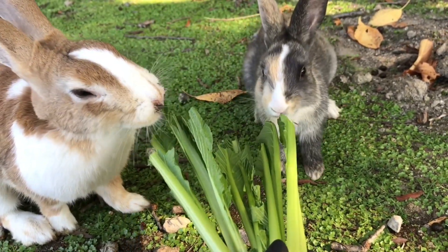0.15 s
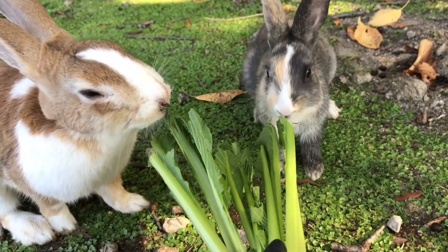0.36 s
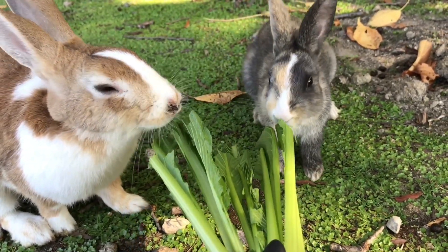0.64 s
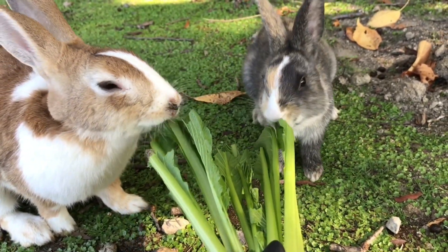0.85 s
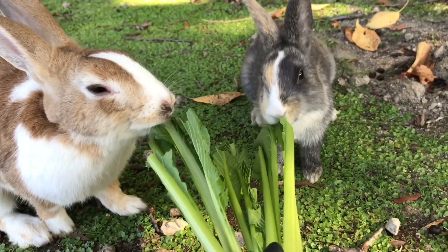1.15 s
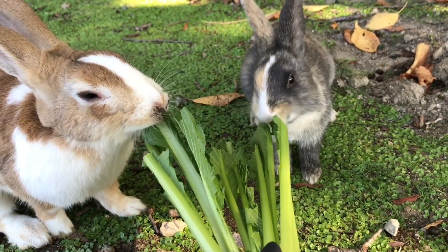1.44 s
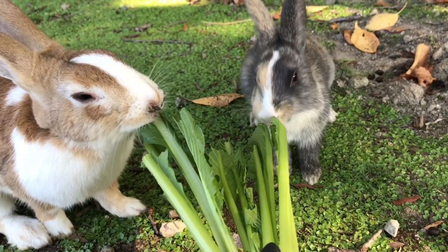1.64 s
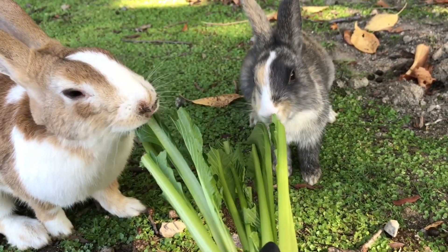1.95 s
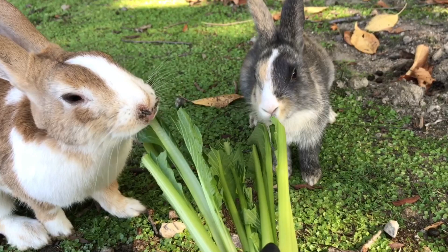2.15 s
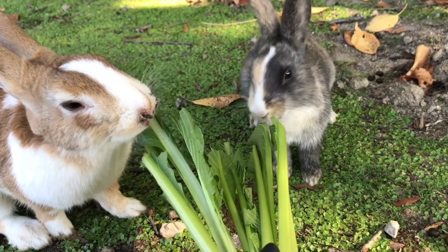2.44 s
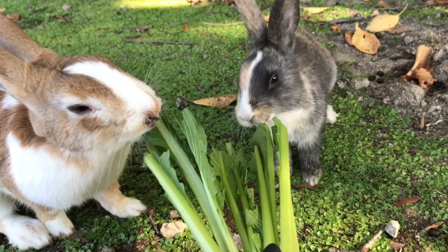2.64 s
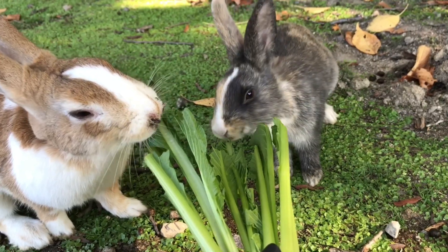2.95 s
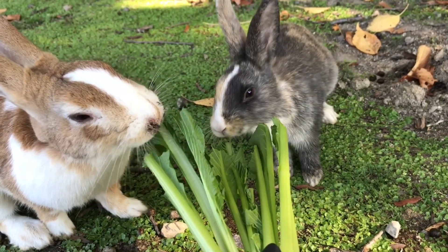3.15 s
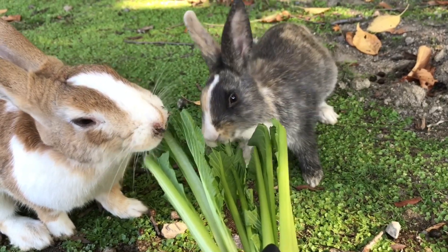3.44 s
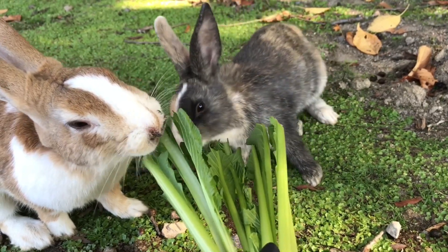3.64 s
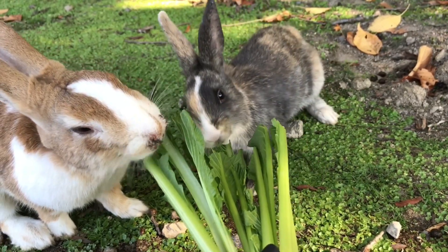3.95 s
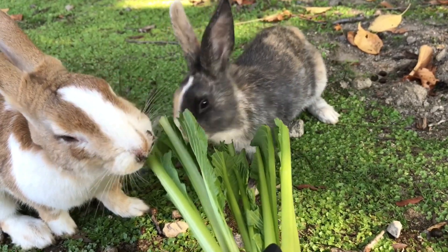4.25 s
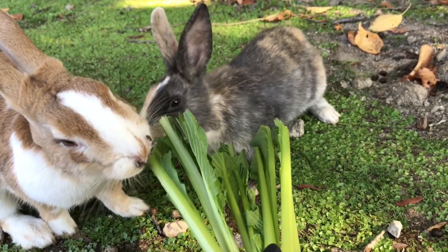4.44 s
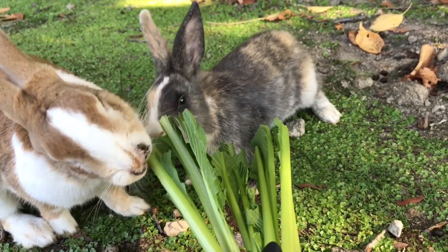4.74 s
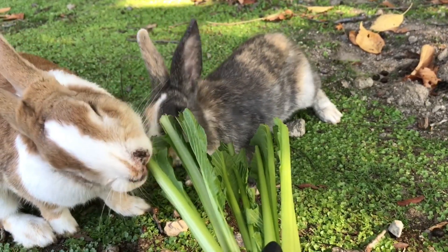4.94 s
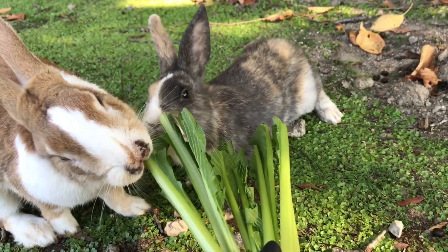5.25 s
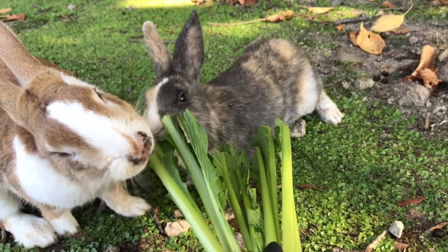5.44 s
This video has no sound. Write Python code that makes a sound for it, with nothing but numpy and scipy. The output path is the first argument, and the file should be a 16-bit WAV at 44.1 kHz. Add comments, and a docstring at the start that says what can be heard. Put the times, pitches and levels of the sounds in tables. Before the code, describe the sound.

Two rabbits bite and chew crisp leaf stalks close up on a lawn, crackling over low rumble, with a faint bird trill and cricket chirps.

```python
"""On a lawn, close to a small microphone, two rabbits bite and chew crisp leaf stalks for 5.6 s.
First bites crackle over low rumble, hiss and a sinking hum; snaps are loudest from 1.1 to 1.6 s.
Far off a bird trills once at 1.6 s, and from 2 s a cricket chirps; chewing thins near 2.5 s and
4.5 s, then crackles again from 5 s. Snaps and grinding are filtered noise bursts, rumble and hiss
shaped noise, the hum a swaying tone, and the far calls sine notes with garden echoes."""
import sys
import numpy as np
from scipy import signal
from scipy.io import wavfile
from scipy.ndimage import uniform_filter1d

SR = 44100
rng = np.random.default_rng(int(sys.argv[2]) if len(sys.argv) > 2 else 0)


def to_wav(sig):
    """Store sig (one row per channel, or 1-D mono) as 16-bit WAV at the path in sys.argv[1].

    Samples outside -1..1 are clipped; the rate is SR.
    """
    pcm = np.clip(np.atleast_2d(sig), -1, 1) * 32767
    pcm = np.round(pcm).astype(np.int16)
    wavfile.write(sys.argv[1], SR, pcm.T)  # frames by channels


N = 246519  # samples, about 5.6 s


def gain_of(db):
    """Decibels to gain."""
    return 10 ** (np.asarray(db) / 20)


def evened(x):
    """Scales to rms 1."""
    return x / np.sqrt(np.mean(x ** 2) + 1e-20)


def read(points, hz):
    """Reads a spectrum on a log-frequency axis."""
    f, value = np.transpose(points)
    return np.interp(np.log(hz + 1), np.log(f + 1), value)


def add(mix, s, sound):
    """Mixes a sound in at second s."""
    part = mix[round(s * SR):][:len(sound)]
    part += sound[:len(part)]


def bump(hz, centre_hz, width_hz):
    """A broad resonance of height 1."""
    return np.exp(-.5 * ((hz - centre_hz) / width_hz) ** 2)


def coloured(x, gain_db):
    """Filters the last axis causally: the phase follows from the log gain (minimum phase)."""
    log_gain = np.log(gain_of(np.maximum(gain_db, -100)))
    circle = np.concatenate([log_gain, log_gain[..., -2:0:-1]], -1)
    spectrum = np.exp(np.conj(signal.hilbert(circle)))
    taps = np.fft.ifft(spectrum).real[..., :256]
    return signal.oaconvolve(x, taps, axes=-1)[..., :x.shape[-1]]


# Clearest single fibres breaking, close to the microphone:
# (time [s], leaf peak [dB], jaw thud relative to leaf [dB], leaf ring [Hz], jaw ring [Hz])
CLEAR_SNAPS = [(.087, -55, 16, 3880, 1280), (.4167, -43, -18, 5940, 1360), (.4206, -27.5, -33, 9900, 820),
               (.81, -28.5, -12.5, 4500, 1230), (.8967, -22, -33, 7900, 1010),
               (.9037, -27, -33, 8650, 1250), (.919, -45, -9, 6030, 1490), (.931, -37, -19, 4110, 1570),
               (.9371, -29.5, -16, 4410, 1420), (.9824, -21.5, -18, 7500, 1440),
               (1.1023, -10, -43, 9200, 1610), (1.108, -27, -24, 8420, 1460),
               (1.1112, -20, -17, 8050, 2350), (1.1271, -25.5, -11, 7710, 1490),
               (1.156, -25, -5, 4630, 1310), (1.1622, -22.5, -7.5, 7140, 1330),
               (1.1751, -31, -13, 7450, 2150), (1.2059, -34, -12, 7360, 2650),
               (1.266, -30, -26, 4670, 1160), (1.2822, -21.5, -28, 10900, 820),
               (1.2872, -18.5, -11, 4500, 1330), (1.2955, -18.5, -16, 4400, 1020),
               (1.3584, -23, -20, 8340, 1030), (1.4213, -17, -24, 5830, 2300),
               (1.4243, -9, -16, 9600, 2380), (1.4274, -28, -5, 8630, 1490), (1.4459, -22, -29, 8460, 2990),
               (1.4497, -18, -20, 7280, 1610), (1.4551, -28, -12, 8810, 1480),
               (1.4576, -27, -8, 9990, 1660), (1.4859, -27, -16, 8310, 1490),
               (1.4889, -25, -13, 6660, 1420), (1.5179, -19, -14, 8940, 1620),
               (1.5292, -32, -28, 6220, 2630), (1.5343, -23, -14, 10200, 1120),
               (1.5393, -8, -15, 6060, 1780), (1.5428, -7, -15, 5100, 2350), (1.5608, -15, -24, 9050, 2020),
               (1.5648, -19.5, -25, 4840, 1020), (1.574, -28, -24, 9650, 2990),
               (1.7099, -27, -16, 10100, 1460), (1.7509, -21.5, -17, 9000, 1770),
               (1.7659, -22, -17, 4530, 1760), (1.7751, -23.5, -9, 6400, 2340),
               (1.8042, -27.5, -9, 4460, 2290), (1.9521, -29.5, -18, 4400, 1940),
               (1.9752, -19.5, -10.5, 9050, 2330), (2.0187, -29, -20, 9780, 1340),
               (2.0304, -30.5, -17, 4700, 2070), (2.121, -32, -10, 5600, 2170),
               (2.1337, -19.5, -13.5, 5070, 2210), (2.1712, -29, -25, 5400, 2000),
               (2.1917, -14.5, -14.5, 5670, 2000), (2.201, -29.5, -8, 5320, 2070),
               (2.3206, -17.5, -24, 8000, 2370), (2.3257, -12, -20.5, 6460, 2250),
               (2.3862, -19.5, -9.5, 6400, 1640), (2.7206, -42.5, -3, 4180, 1250),
               (2.9191, -26, -12.5, 5170, 2370), (2.9295, -31, -12, 6850, 2260),
               (2.9696, -30.5, -1, 4400, 2100), (2.9725, -25, -11.5, 4300, 2320),
               (2.9941, -33, -22, 9710, 900), (3.2039, -25.5, -7, 4600, 2230),
               (3.2067, -20.5, -9, 9400, 2250), (3.2353, -18.5, -15.5, 5540, 2310),
               (3.2577, -46, 9, 8810, 1120), (3.2665, -39.5, 3, 9970, 1100),
               (3.3467, -33.5, -10, 4440, 1240), (3.4305, -25, -29, 7900, 1010),
               (3.4353, -20, -28, 4220, 1290), (3.4467, -24, -15, 4570, 1290),
               (3.4683, -22.5, -12.5, 5640, 2300), (3.4736, -25, -12, 9400, 2300),
               (3.5689, -40, -9, 9000, 1100), (3.6174, -32, -23, 6310, 1270),
               (3.6546, -25.5, -28, 9000, 1360), (3.6844, -30, -24, 4720, 1400),
               (3.7003, -14, -12, 5340, 2200), (3.8891, -28, -31, 4400, 1380),
               (3.926, -42, 2.5, 4220, 2280), (4.0291, -18.5, -21, 10600, 2300),
               (4.0343, -17.5, -16.5, 4900, 2270), (4.0413, -20.5, -12, 3800, 2420),
               (4.0938, -18, -18.5, 6600, 2540), (4.1578, -25.5, -13.5, 3980, 2520),
               (4.9946, -22.5, -17, 4200, 2970), (5.1754, -20.5, -12.5, 9500, 2750),
               (5.1897, -24, -18, 10800, 2410), (5.2027, -22, -9.5, 3900, 2710),
               (5.2135, -28, -13, 8910, 1450), (5.2371, -22.5, -25, 9100, 2540),
               (5.2594, -26.5, -22, 9500, 2330), (5.4104, -33.5, -27, 10300, 860),
               (5.434, -38.5, -6, 10340, 1230), (5.4992, -36.5, -1, 5990, 1360),
               (5.508, -30, -17, 4370, 2250)]
# Colour of the breaking leaf, in snaps and grinding: (frequency [Hz], relative level [dB])
LEAF_COLOUR = [(2000, -31), (3400, -13), (3800, -0.5), (5000, 0), (6000, 2), (7500, -0.5), (9600, 3),
               (12000, -0.5), (22000, -25)]
# Colour of the jaw's knock: (frequency [Hz], relative level [dB])
JAW_COLOUR = [(300, -39), (700, -4), (1400, -0.5), (2300, 1), (2900, -3), (3500, -12.5), (6000, -41)]
SNAP_DECAY_MS, SNAP_TAIL_MS, SNAP_TAIL_DB = .22, 1.6, -15  # typical decay; faint after-crackle
BRIGHT_SCATTER_DB = 2.0  # each break is brighter or duller by chance
TILT_HZ = 7200  # parts dull from bright crackle


def snaps():
    """Each break is a very short burst of noise with a faint after-crackle, heard through leaf and jaw."""
    t_ms, hz = np.arange(400) * 1000 / SR, np.fft.rfftfreq(1024, 1 / SR)
    columns = np.vstack([CLEAR_SNAPS, lesser_snaps()]).T
    s, peak_db, jaw_db, leaf_hz, jaw_hz = columns[:, :, None]
    draws = rng.standard_normal((len(s), 402))
    decay_ms = SNAP_DECAY_MS * np.exp(.3 * draws[:, :1])
    bright_db = BRIGHT_SCATTER_DB * draws[:, 1:2]
    noise_burst = draws[:, 2:]

    after_crackle = gain_of(SNAP_TAIL_DB) * np.exp(-t_ms / SNAP_TAIL_MS)
    onset = np.minimum(t_ms / .12, 1)
    burst = noise_burst * (np.exp(-t_ms / decay_ms) + after_crackle) * onset

    # tips the balance of bright and dull crackle at random for each break
    tilt = .5 * np.tanh((hz - TILT_HZ) / 1200)
    leaf_db = read(LEAF_COLOUR, hz) + bright_db * tilt + 9 * bump(hz, leaf_hz, 790)
    knock_db = read(JAW_COLOUR, hz) + 8 * bump(hz, jaw_hz, 224)
    leaf = unit_peak(coloured(burst, leaf_db))
    jaw = unit_peak(coloured(burst, knock_db))
    sounds = gain_of(peak_db) * (leaf + gain_of(jaw_db) * jaw)
    out = np.zeros(N)
    for start, sound in zip(s[:, 0], sounds):
        add(out, start, sound)
    return out


def unit_peak(x):
    """Scales each row to an envelope peak of 1."""
    return x / abs(signal.hilbert(x)).max(1, keepdims=True)


LESSER_PER_CHEW = 3
LESSER_DB, LESSER_SCATTER_DB = 10, 7.5  # typical peak over the stroke's level, and its scatter
LESSER_JAW_DB, LESSER_JAW_SCATTER_DB = -11, 5.8  # jaw thud over the stroke's cheek share
LEAF_RING_HZ, JAW_RING_HZ = (4000, 10000), (850, 2500)  # ranges of their rings
HARD_STROKE_DB = -45  # strokes softer than this mash the leaf and break fibres less cleanly
MASH_LOSS = 0.71  # dB lost by lesser breaks per dB of softness


def lesser_snaps():
    """Rows like CLEAR_SNAPS for small breaks scattered through every stroke, weaker towards its ends."""
    s, db, rise_ms, fall_ms, cheek_db = np.repeat(CHEW_STROKES, LESSER_PER_CHEW, axis=0).T
    size, jaw = rng.standard_normal((len(s), 2)).T
    place, leaf_pick, jaw_pick = rng.random((len(s), 3)).T
    lag = 2 * place - 1  # -1 at the start of the stroke, 0 at its peak, 1 at its end
    when = s + lag * np.where(lag < 0, rise_ms, fall_ms) / 1000
    mash_db = MASH_LOSS * np.maximum(HARD_STROKE_DB - db, 0)
    peak_db = db + LESSER_DB + LESSER_SCATTER_DB * size - 5.0 * lag ** 2 - mash_db
    jaw_db = cheek_db + LESSER_JAW_DB + LESSER_JAW_SCATTER_DB * jaw
    leaf_hz = np.interp(leaf_pick, [0, 1], LEAF_RING_HZ)
    jaw_hz = np.interp(jaw_pick, [0, 1], JAW_RING_HZ)
    return np.transpose([when, peak_db, jaw_db, leaf_hz, jaw_hz])


# Grinding strokes of the teeth, close by; rise and fall are the times to 9.5 dB below the peak:
# (time of peak [s], level [dB], rise [ms], fall [ms], cheek thud relative to the stroke [dB])
CHEW_STROKES = [(.09, -83, 4.4, 6, 0), (0.229, -56, 68, 12, 0.5), (0.42, -55.5, 3.9, 41, 1),
                (.471, -49.5, 25, 11, 0), (0.681, -51, 41, 6.5, -4), (.81, -58.5, 34, 160, -4),
                (.903, -41.5, 8.1, 23, -11.5), (.988, -48.5, 19, 12, -12), (1.018, -48.5, 11, 33, -15),
                (1.106, -41, 14.3, 50, -11.5), (1.157, -45, 7.3, 16, -17), (1.206, -56.5, 21, 20, -10),
                (1.293, -49.5, 40, 7.7, -30), (1.425, -40, 6.1, 11.4, -16), (1.453, -36, 10, 10.7, -19),
                (1.489, -38, 7, 7.1, -10), (1.513, -42, 10, 10.2, -11), (1.542, -41, 4, 11, -19),
                (1.568, -49.5, 8.5, 16, -8), (1.73, -50, 10, 23, -3), (1.771, -49, 58, 32, -9),
                (1.805, -52, 15, 10, -12), (1.835, -56, 12, 20, -4), (1.979, -47, 24, 30, -13),
                (2.196, -52, 37, 4, -8), (2.325, -43, 6.9, 22.5, -22), (2.39, -50.5, 4.4, 30, -2.5),
                (2.538, -52, 26, 19, -9), (2.924, -51, 11, 23, -15), (2.968, -46, 5.8, 8.6, -4),
                (2.999, -54, 15, 13, -5), (3.204, -45.5, 20, 9, -10), (3.23, -54.5, 21, 18, -1),
                (3.352, -58, 17, 16, 0), (3.443, -41, 29, 11, -17), (3.47, -48, 17, 17, -14),
                (3.622, -47, 8, 24, -11), (3.659, -46, 18, 45, -10.5), (3.889, -44, 18, 8.3, -13),
                (3.925, -54, 63, 30, -5.5), (4.039, -50.5, 11, 10, -3), (4.094, -51, 13, 9, -5),
                (4.284, -56.5, 54, 36, -1), (4.5, -59, 12, 31, 1), (4.758, -56, 32, 13, -4.5),
                (4.997, -47, 5.5, 7.4, -13), (5.173, -45, 8, 12, -7.5), (5.2, -41, 16, 14, -11),
                (5.232, -46, 19, 7.9, -9), (5.265, -47, 5.5, 15, -4), (5.416, -52.5, 6.9, 19, -15),
                (5.505, -64.5, 17, 24, 6.5), (5.557, -50.5, 9.9, 15, -8)]
# Colour of the muffled cheek: (frequency [Hz], relative level [dB])
CHEEK_COLOUR = [(300, -20), (700, -16), (1100, 0.5), (1500, 3.5), (2300, -8), (3200, -10.5), (6000, -42)]
CRACKLE_PER_S = 1600  # average number of cell bursts per second
CHEW_BRIGHT_DB = -2.5  # bright against dull part: grinding is a little dull


def grinding():
    """Dense tiny cell bursts of uneven size and colour, swelling with each stroke of the teeth."""
    t_ms, hz = np.arange(N) * 1000 / SR, np.fft.rfftfreq(1024, 1 / SR)
    power = np.zeros((3, N))  # dull leaf, bright leaf, cheek
    for s, db, rise_ms, fall_ms, cheek_db in CHEW_STROKES:
        lag = t_ms - 1000 * s
        steps = (lag / np.where(lag < 0, rise_ms, fall_ms)) ** 2
        stroke = gain_of(db - 9.5 * np.minimum(steps, 20))
        shares = gain_of([[-CHEW_BRIGHT_DB / 2], [CHEW_BRIGHT_DB / 2], [cheek_db]])
        power += (stroke * shares) ** 2

    size = gain_of(4.5 * np.minimum(rng.exponential(1, N), 3.5))
    size = size * (rng.random(N) < CRACKLE_PER_S / SR)
    cells = size * rng.choice([-1., 1.], N) + .2 * rng.standard_normal(N)
    rings_hz = np.linspace(4000, 10500, 6)[:, None]  # six kinds of cell, each with its own ring
    kinds = cells * (rng.integers(0, 6, N) == np.arange(6)[:, None])
    ringing = coloured(kinds, read(LEAF_COLOUR, hz) + 12 * bump(hz, rings_hz, 700))
    leaf = evened(ringing.sum(0))
    dull = signal.oaconvolve(leaf, signal.firwin(31, TILT_HZ, fs=SR), "same")
    pulp = cells + 0.74 * rng.standard_normal(N)  # wet pulp smooths the thud
    cheek = evened(coloured(pulp, read(CHEEK_COLOUR, hz)))
    return (np.sqrt(power) * [dull, leaf - dull, cheek]).sum(0)


# Cricket chirps, far off: (time [s], level before the pulse offsets [dB])
CRICKET_CHIRPS = [(1.97, -61), (2.609, -54), (3.264, -52), (3.9, -54), (4.463, -64), (4.547, -54.5),
                  (5.225, -58)]
CHIRP_HZ, PULSE_S, PULSES_DB = 5640, .017, [-9, 0, -4, -7]  # pitch, pulse length, pulse offsets
TRILL_S, NOTE_SPACING_S, TRILL_NOTES = 1.564, .0334, 7
TRILL_DB, LAST_NOTE_DB = -51.5, -4  # the last note is relative to the others
NOTE_TOP_HZ, NOTE_END_HZ, NOTE_S = 3620, 3080, .018  # one falling note
ECHO_T60, ECHO_DB = .15, -12  # garden echoes: 60 dB decay time in s, level


def distant_calls():
    """Falling sine notes of the bird and pulsed chirps of the cricket, smeared by echoes from the garden."""
    out = np.zeros(N)
    hz = np.linspace(NOTE_TOP_HZ, NOTE_END_HZ, round(NOTE_S * SR))
    note = np.sin(2 * np.pi * np.cumsum(hz) / SR) * np.hanning(len(hz)) ** 0.85
    for k in range(TRILL_NOTES):
        note_db = TRILL_DB + LAST_NOTE_DB * (k == TRILL_NOTES - 1)
        add(out, TRILL_S + k * NOTE_SPACING_S, gain_of(note_db) * note)

    t = np.arange(round(PULSE_S * SR)) / SR
    pulse = np.sin(2 * np.pi * CHIRP_HZ * t) * np.hanning(len(t)) ** 0.31
    for s, db in CRICKET_CHIRPS:
        for k, pulse_db in enumerate(PULSES_DB):
            scatter_db = 2.5 * rng.standard_normal()
            add(out, s + k * PULSE_S, gain_of(db + pulse_db + scatter_db) * pulse)

    lag = np.arange(6000) / SR
    echoes = rng.standard_normal(len(lag)) * gain_of(-60 * lag / ECHO_T60) * (lag > .004)
    echoes = echoes / np.linalg.norm(echoes)
    return out + gain_of(ECHO_DB) * signal.oaconvolve(out, echoes)[:N]


HUM_HZ, HUM_SAG_HZ_PER_S, HUM_WIDTH_HZ = 210.4, 2.9, 3.7  # starting pitch, fall, width of the sway
HUM_DB, HUM_FADE_DB_PER_S = -46.5, 0.65  # starting level, fade


def hum():
    """A narrow tone that sways in level, drifts down in pitch and slowly fades."""
    t = np.arange(N) / SR
    turns = np.cumsum(HUM_HZ - HUM_SAG_HZ_PER_S * t) / SR
    r = np.exp(-np.pi * HUM_WIDTH_HZ / SR)
    jitter = rng.standard_normal(N) + 1j * rng.standard_normal(N)
    sway = signal.lfilter([1 - r], [1, -r], jitter)
    carrier = (1.5 + sway / np.std(sway)) * np.exp(2j * np.pi * turns)
    return gain_of(HUM_DB - HUM_FADE_DB_PER_S * t) * evened(carrier.real)


def noise(shape, size, patchy_db):
    """Short-time spectra of noise with drifting patches, with their frequencies and times."""
    frames, hz = 4 * N // size + 5, np.fft.rfftfreq(size, 1 / SR)
    a, b, patches = rng.standard_normal((frames, len(hz), 3)).T
    patches = uniform_filter1d(uniform_filter1d(patches, 8, 0), 8, 1)
    level_db = read(shape, hz)[:, None] + patchy_db * evened(patches)
    return hz, np.arange(frames) * size / 4 / SR, (a + 1j * b) * gain_of(level_db)


# Swells of the far rumble, in regions centred on 62-95 Hz, on 135-215 Hz and from 255 Hz up:
# (time [s], deep level [dB], middle level [dB], upper level [dB])
RUMBLE_SWELLS = [(0, -39.5, -38.5, -51.5), (.17, -36.5, -34.5, -43), (.45, -37.5, -36.5, -48),
                 (.83, -31, -38.5, -49.5), (1.1, -36.5, -39, -49.5), (1.43, -35, -36.5, -42.5),
                 (1.59, -43, -41, -43), (1.9, -31.5, -39, -52), (2.26, -35.5, -45, -46.5),
                 (2.62, -34, -47, -45.5), (2.94, -35.5, -34, -45), (3.13, -31.5, -38, -52),
                 (3.38, -37, -30, -41.5), (3.5, -36.5, -37.5, -43), (4.28, -40, -45, -53),
                 (4.65, -52, -43, -49), (4.85, -40.5, -39, -46.5), (5.22, -39, -44.5, -45),
                 (5.4, -33, -38, -49.5), (5.59, -31, -32.5, -43)]
# Colour of the rumble: (frequency [Hz], relative density [dB per Hz])
RUMBLE_COLOUR = [(13, -38), (22, -44), (38, -38), (59, 2), (81, 17), (119, -4), (152, -0.5), (183, -11),
                 (210, -8.5), (247, -17), (306, -18.5), (365, -15.5), (440, -32), (570, -88), (970, -120)]
BOTTOM_DB = -47.5  # steady lowest part


def rumble():
    """Far traffic-like rumble: three overlapping regions swell on their own above a steady bottom."""
    hz, t, z = noise(RUMBLE_COLOUR, size=4096, patchy_db=.6)
    s, *levels = np.transpose(RUMBLE_SWELLS)
    edges_hz = [45, 62, 95, 135, 215, 255]
    places = np.interp(np.log(hz + 1), np.log(edges_hz), [0, 1, 1, 2, 2, 3])  # region numbers
    out = 0
    for k, db in enumerate([BOTTOM_DB + 0 * s] + levels):
        share = np.maximum(1 - abs(places - k), 0)[:, None]
        part = signal.istft(z * share, nperseg=4096, noverlap=3072)[1][:N]
        out = out + evened(part) * gain_of(np.interp(np.arange(N) / SR, s, db))
    return out


# Colour of the outdoor hiss: (frequency [Hz], relative density [dB per Hz])
HISS_COLOUR = [(250, -23), (420, -14), (457, -1), (558, 2), (773, -10.5), (983, -6.5), (1890, -14.5),
               (3330, -16.5), (4000, -13), (7470, -17), (9640, -16), (12400, -23)]
# Slow swells of the hiss, raised by 3 dB when played: (time [s], level [dB])
HISS_SWELLS = [(0.0, -61), (0.36, -53), (0.62, -59.5), (1.42, -55.5), (1.7, -58), (2.82, -56),
               (3.24, -59.5), (3.56, -54), (3.94, -60.5), (4.44, -59), (5.14, -58.5), (5.59, -58)]


def hiss():
    """Gently swelling outdoor wash of leaves and distance, made of patchy shaped noise."""
    hz, t, z = noise(HISS_COLOUR, size=1024, patchy_db=1.82)
    level_db = np.interp(t, *np.transpose(HISS_SWELLS))
    swell_share = np.clip(1 - hz / 5000, .2, 1)[:, None]  # treble stays steadier
    swell_db = (level_db - level_db.mean()) * swell_share
    wash = signal.istft(z * gain_of(swell_db), nperseg=1024, noverlap=768)[1][:N]
    return gain_of(level_db.mean() + 3) * evened(wash)


def scene():
    """All sources, near and far, at the single microphone."""
    return (snaps() + grinding() + rumble() + hum() + hiss() + distant_calls())[None]


# Treble loss of the small microphone: (frequency [Hz], gain [dB])
MIC_TREBLE = [(10000, 0), (11000, -2.5), (11700, -11.5), (12400, -27), (13500, -22)]
EDGE_HZ = 12600  # band limit


def record(dry):
    """The microphone loses treble above 10 kHz; then a steep low-pass limits the band."""
    heard = coloured(dry, read(MIC_TREBLE, np.fft.rfftfreq(1024, 1 / SR))[None])
    low_pass = signal.firwin(255, EDGE_HZ, window=("kaiser", 9), fs=SR)
    return signal.oaconvolve(heard, low_pass[None], "same")


dry = scene()
out = record(dry)
to_wav(out)
```